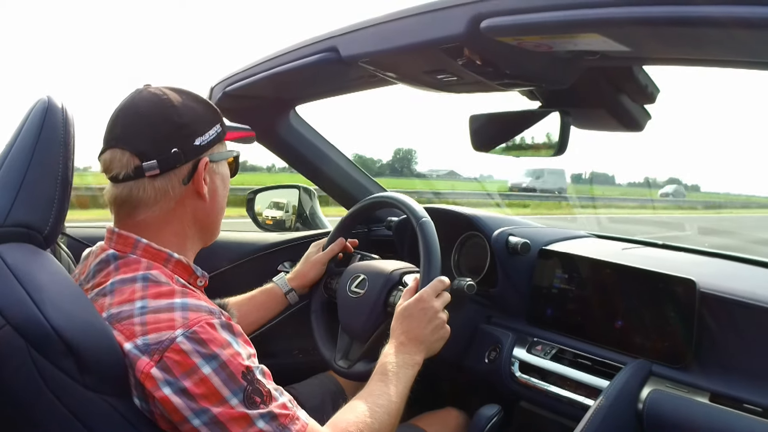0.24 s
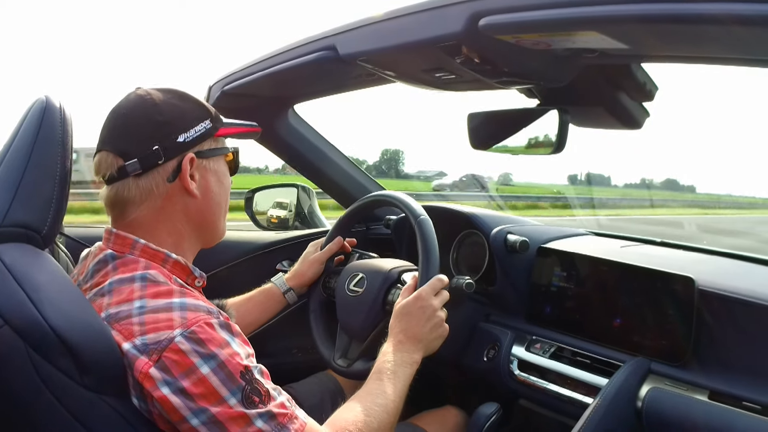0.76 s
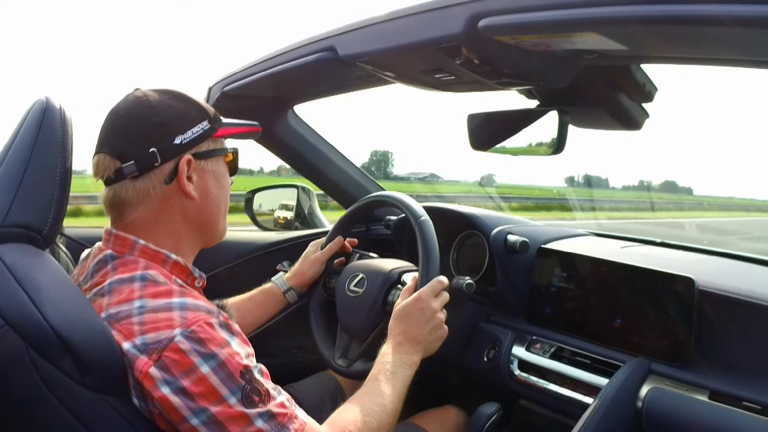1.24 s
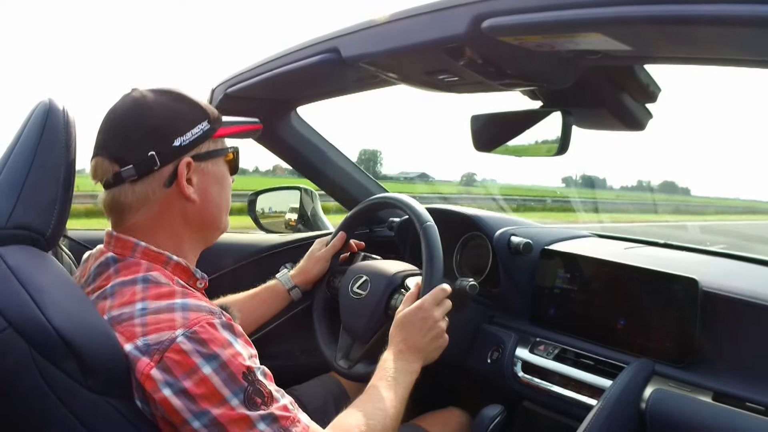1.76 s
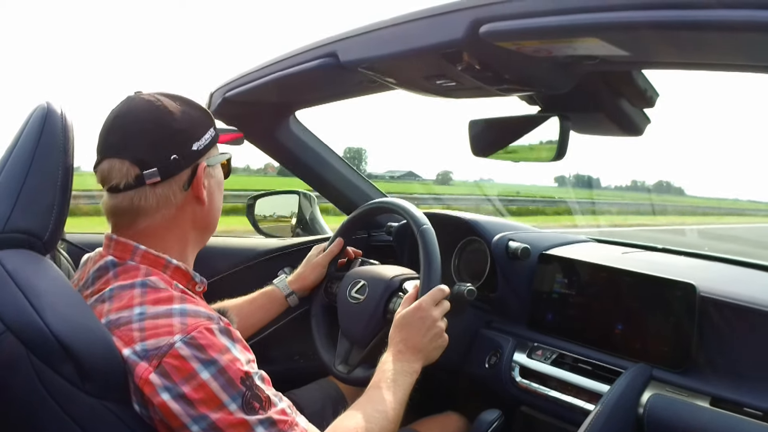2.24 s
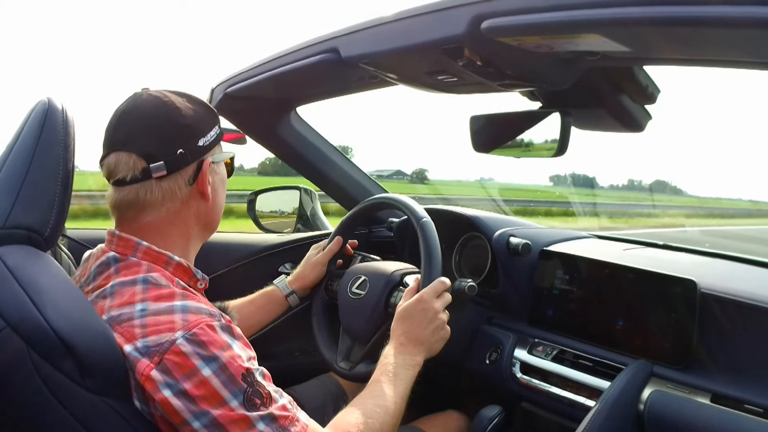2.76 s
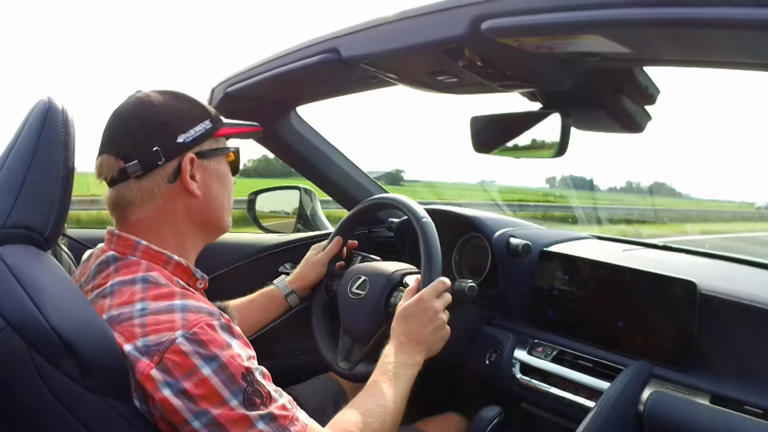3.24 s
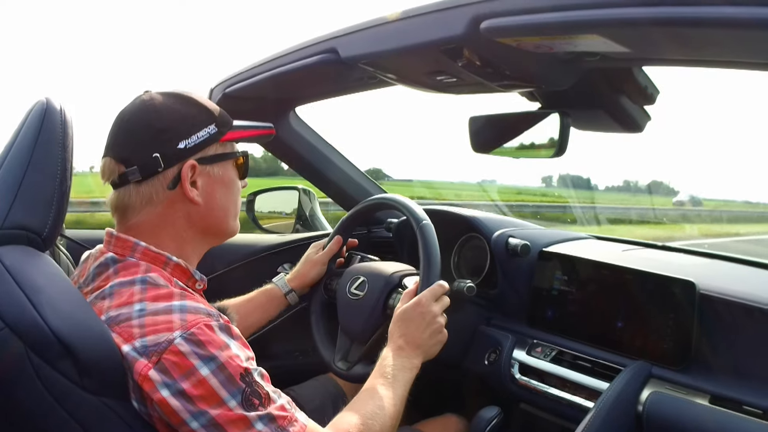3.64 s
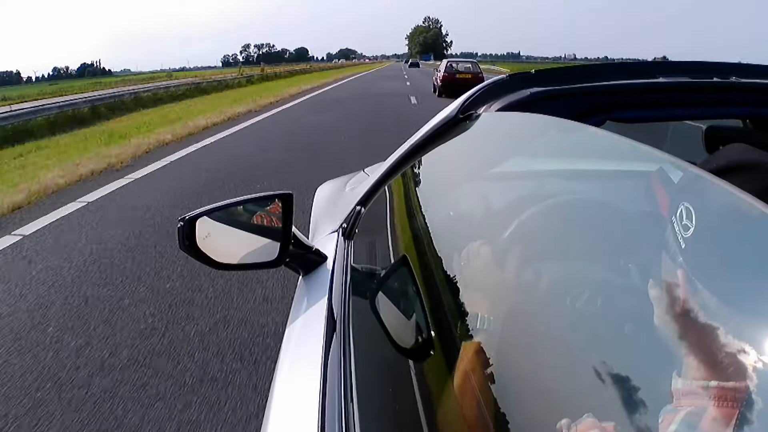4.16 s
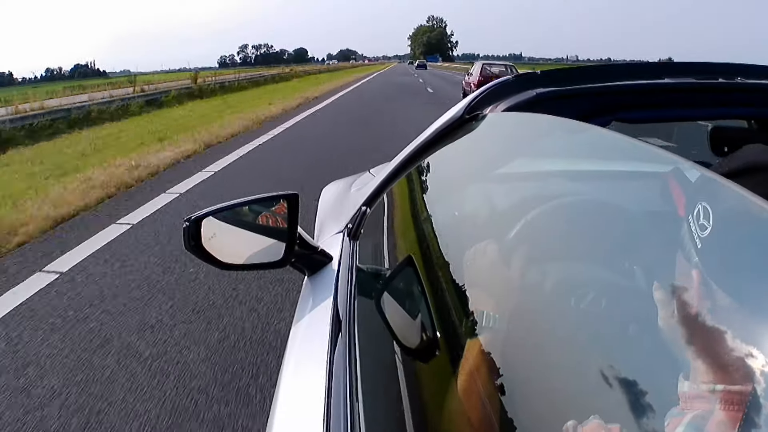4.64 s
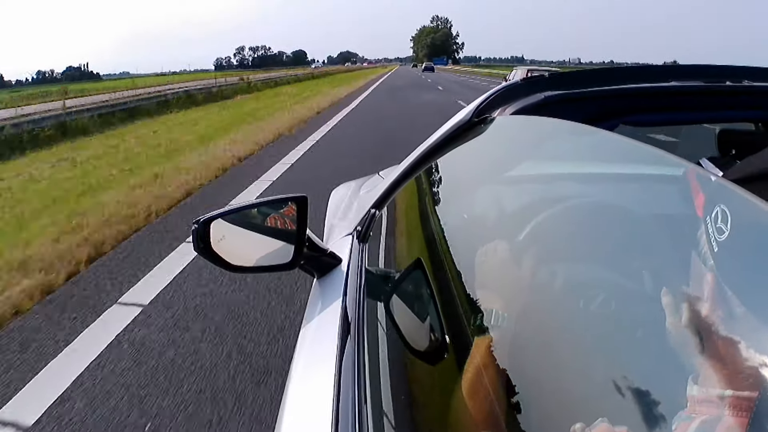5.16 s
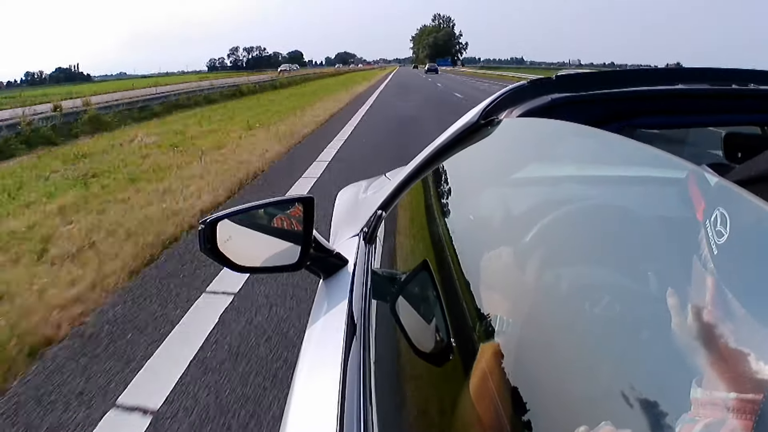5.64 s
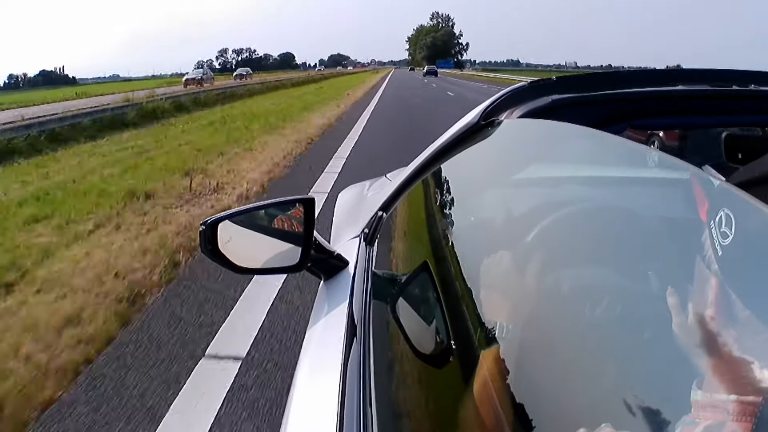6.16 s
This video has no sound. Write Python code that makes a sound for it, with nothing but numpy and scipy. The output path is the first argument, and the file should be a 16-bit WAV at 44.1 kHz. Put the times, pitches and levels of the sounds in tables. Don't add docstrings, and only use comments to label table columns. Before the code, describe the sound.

Wind buffets and road roar in an open-top car, then a big eight-cylinder engine kicks down and climbs to a hard, sustained howl.

```python
import sys
import numpy as np
from scipy import signal
from scipy.fft import rfft, irfft
from scipy.io import wavfile
from scipy.ndimage import uniform_filter1d

SR = 44100
rng = np.random.default_rng(int(sys.argv[2]) if len(sys.argv) > 2 else 0)


def materialize(psi):
    bounded = np.clip(np.atleast_2d(psi).T, -1, 1)
    quanta = np.round(bounded * 32767).astype(np.int16)
    wavfile.write(sys.argv[1], SR, quanta)


def amplitude_ratio(level_db):
    exponent = np.asarray(level_db, float) / 20
    return 10 ** exponent


N = 282240


def curves(table):
    s, *columns = np.transpose(table)
    return [np.interp(np.arange(N) / SR, s, c) for c in columns]


def humps(table, power):
    t = np.arange(N) / SR
    return sum(db * np.exp(-abs(2 * (t - s) / length) ** power) for s, length, db in table)


def walk(rate):
    hold = int(SR / rate)
    levels = np.repeat(rng.standard_normal(N // hold + 1), hold)
    return 1.3 * uniform_filter1d(uniform_filter1d(levels, hold), hold)[:N]


def band(x, lo_hz, hi_hz):
    y = signal.sosfilt(signal.butter(2, [lo_hz, hi_hz], "bandpass", fs=SR, output="sos"), x)
    return y / np.sqrt(np.mean(y ** 2))


def turbulence(colour, flicker_db, rate):
    hz, db = np.transpose(colour)
    f = np.maximum(np.arange(N // 2 + 1) * SR / N, 1)
    colour_db = np.interp(np.log2(f), np.log2(hz), db, -120, -120)
    spectrum = rfft(rng.standard_normal(N)) * amplitude_ratio(colour_db)
    out = 0
    for centre in np.arange(np.log2(hz[0]), np.log2(hz[-1]) + 0.5, 0.5):
        window = np.clip(1 - 2 * abs(np.log2(f) - centre), 0, 1)
        out = out + amplitude_ratio(flicker_db * walk(rate)) * irfft(spectrum * window, N)
    return out / np.sqrt(np.mean(out ** 2))


def resonance(hz, modes):
    return sum(amplitude_ratio(db) / (1 + (2 * (hz - f) / width) ** 4) for f, width, db in modes)


def engine():
    # start_s, rate_hz
    revs = [(3.3, 17.6), (3.43, 19.3), (3.55, 22.4), (3.7, 28.2), (3.89, 33.3), (3.96, 33.3), (4.05, 30.9),
            (4.12, 34.0), (4.18, 35.4), (4.28, 33.0), (4.57, 35.6), (4.73, 39.6), (4.84, 42.8),
            (4.92, 44.5), (5.18, 45.3), (5.53, 45.8), (6.32, 48.2)]
    # start_s, below_full_db
    load = [(2.6, -30), (2.95, -25), (3.05, -15), (3.4, -19.5), (3.5, -10.5), (3.57, -16.5), (3.64, -10.5),
            (3.85, -6), (3.96, -0.5), (4.06, -5.5), (4.17, 1.5), (4.3, -4), (4.56, -2), (4.81, -7.5),
            (5.1, 1), (5.45, -0.5), (5.9, -3.5), (6.4, -2)]
    # multiple, level_db
    uneven = [(2, -8.5), (3, -3.5), (4, -5), (5, 4.5), (6, 2), (7, -3.5), (9, 1.5), (10, 1.5), (11, 0),
              (12, -3.5), (13, -3), (14, 1), (15, -0.5), (16, -3.5), (17, 3), (18, 5), (19, -4.5),
              (20, -1.5), (21, 3), (22, 3)]
    # start_s, level_db
    odd = [(3.35, -11), (3.6, -0.6)]
    # pitch_hz, level_db
    firing = [(140, -25.5), (170, -19.5), (225, -26.5), (270, -35.5), (320, -35), (354, -19.5), (366, -29),
              (378, -35)]
    # pitch_hz, width_hz, level_db
    burble = [(171.3, 66, -4.5), (212, 85, -11.5), (251.5, 19, -14.5), (295, 28, -14)]
    howl = [(357.5, 41, -7), (371.3, 39, 0.5), (409.7, 25, -3.5)]
    rasp = [(484, 30, -9.5), (527, 140, -10.5), (533, 80, -18.5), (653, 102, -10.5), (734, 122, -10.5),
            (853, 110, -23), (973, 130, -20.5), (1300, 660, -23)]

    hz, = curves(revs)
    load_db, = curves(load)
    odd_db, = curves(odd)
    firing_db = 0.34 * load_db + np.interp(8 * hz, *np.transpose(firing))
    burble_db = -25 + 0.69 * load_db
    howl_db = -22.5 + 1.06 * load_db
    rasp_db = -37.5 + 0.15 * load_db + 14 * np.log2(hz / 45.6)

    phase = 2 * np.pi * np.cumsum(hz) / SR
    strength = dict(uneven)
    out = np.sqrt(2) * amplitude_ratio(firing_db + 1.3 * walk(14)) * np.sin(8 * phase)
    for k in range(2, 35):
        if k == 8:
            continue
        f = k * hz
        gain = amplitude_ratio(burble_db) * resonance(f, burble)
        gain += amplitude_ratio(howl_db) * resonance(f, howl)
        gain += amplitude_ratio(rasp_db) * resonance(f, rasp)
        waver = amplitude_ratio(strength.get(k, -2.5) + k % 2 * odd_db + (1.1 + 0.08 * k) * walk(12))
        jitter = 2 * np.pi * rng.random() + (0.1 + 0.02 * k) * walk(10)
        out += np.sqrt(2) * gain * waver * np.sin(k * phase + jitter)

    gas = rng.standard_normal(N) * (1 + 0.65 * np.sin(phase))
    out += amplitude_ratio(howl_db - 15.5) * band(gas, 330, 405)
    out += amplitude_ratio(rasp_db - 13.5) * band(gas, 610, 1000)
    out += amplitude_ratio(rasp_db - 14) * band(gas, 900, 1700)
    return out * np.clip((np.arange(N) / SR - load[0][0]) / 0.69, 0, 1)


def buffet():
    # pitch_hz, level_db
    colour = [(7.1, -51.5), (12, -13.5), (27, 1), (43, -1.5), (58, -10), (67, -17.5), (70, -22.5),
              (90, -27), (120, -37.5), (200, -120)]
    # centre_s, length_s, level_db
    gusts = [(.05, 0.052, -16.5), (.11, 0.069, 6), (.21, 0.038, -19), (.68, 0.18, 5), (.78, 0.064, -26),
             (1.14, 0.081, 9.5), (1.25, 0.029, 12.5), (1.35, 0.19, -3), (2.24, 0.041, -11),
             (2.46, 0.18, -2.5), (2.64, 0.086, 2.5), (2.92, 0.054, -11), (2.97, 0.015, 8),
             (3.18, 0.089, 7.5), (3.29, 0.059, -9), (3.39, 0.092, 5), (3.5, .05, -6.5), (3.58, 0.067, 4.5),
             (3.75, .1, -3), (3.94, 0.079, 9), (4.03, .06, -23), (4.11, 0.053, 10), (4.16, .05, -16),
             (4.46, 0.11, 7), (4.6, 0.075, 8.5), (4.81, 0.076, 7), (5.05, 0.039, 4.5), (5.56, 0.035, 6),
             (5.77, 0.064, -15), (5.98, 0.061, 5.5)]
    x = turbulence(colour, 1.0, 2)
    even = (uniform_filter1d(x ** 2, size=SR // 16) + 0.00075) ** -0.35
    db = -19 - 0.35 * abs(np.arange(N) / SR - 4.8) + humps(gusts, 2)
    return amplitude_ratio(db) * x * even


def floor_drum():
    # start_s, pitch_hz, level_db
    drum = [(5.0, 139, -33), (5.3, 137, -35), (5.5, 142, -35), (5.92, 146.5, -31), (5.98, 147, -40),
            (6.05, 147.2, -28), (6.29, 150, -26.5), (6.4, 152.5, -25)]
    hz, db = curves(drum)
    phase = 2 * np.pi * np.cumsum(hz) / SR + 0.11 * walk(7.9)
    hum = np.sqrt(2) * amplitude_ratio(db + 1.5 + 0.8 * walk(5)) * np.sin(phase)
    return hum * np.clip((np.arange(N) / SR - drum[0][0]) / 0.25, 0, 1)


def air_flow_db():
    # start_s, level_db
    flow = [(0, 0), (1.0, .5), (1.9, 1), (2.15, 2), (2.6, -2), (3.0, -2), (3.5, -1.5), (4.0, 0), (4.6, 1),
            (4.95, 0), (5.3, 6.5), (5.8, 6.5), (6.4, 7)]
    return curves(flow)[0]


def tyre_roar():
    # pitch_hz, level_db
    colour = [(35, -19.5), (60, -2), (70, -26.5), (75, -11.5), (113, -12), (171, -11), (218, -17.5),
              (238, -23.5), (278, -21.5), (333, -27.5), (393, -22), (500, -29.5), (600, -33.5), (780, -45),
              (1320, -120)]
    # centre_s, length_s, level_db
    surface = [
        (.1, 0.41, 3.5),
        (1.75, 0.35, 1),
        (2.7, 0.27, 0),
        (3.5, 0.52, -1.5),
        (4.8, 0.7, 4.5),
        (6.1, 0.48, 1.5),
    ]
    db = -28.5 + 0.4 * air_flow_db() + humps(surface, 0.68)
    return amplitude_ratio(db) * turbulence(colour, 1.28, 3.51)


def air_rush():
    # pitch_hz, level_db
    colour = [(240, -39), (400, -9.5), (500, -10), (634, -3.5), (722, -8), (785, -5), (1110, -9.5),
              (1260, -7), (1400, -12.5), (2500, -32), (3250, -72), (5500, -120)]
    return amplitude_ratio(-42 + air_flow_db()) * turbulence(colour, 1.0, 11)


def passing_car():
    # centre_s, length_s, over_faintest_db
    passing = [
        (2.62, 0.96, 31.1),
    ]
    return amplitude_ratio(-75 + humps(passing, 1)) * band(rng.standard_normal(N), 560, 820)


def air_hiss():
    # pitch_hz, level_db
    colour = [(1500, 5.5), (2200, -1), (3200, -4), (4500, -9), (5600, -15), (6500, -17.5), (8000, -15.5),
              (9600, -18), (12000, -21), (13500, -24), (16000, -25.5)]
    return amplitude_ratio(-53 + 0.6 * air_flow_db()) * turbulence(colour, 0.12, 12.0)


def scene():
    background = tyre_roar() + air_rush() + passing_car() + air_hiss()
    return (engine() + buffet() + floor_drum() + background)[None]


def top_cut(x):
    return signal.sosfilt(signal.butter(12, 15760, fs=SR, output="sos"), x)


def record(dry):
    mix = np.tanh(1.085 * dry) / 1.354
    return top_cut(mix)


dry = scene()
out = record(dry)
materialize(out)
```